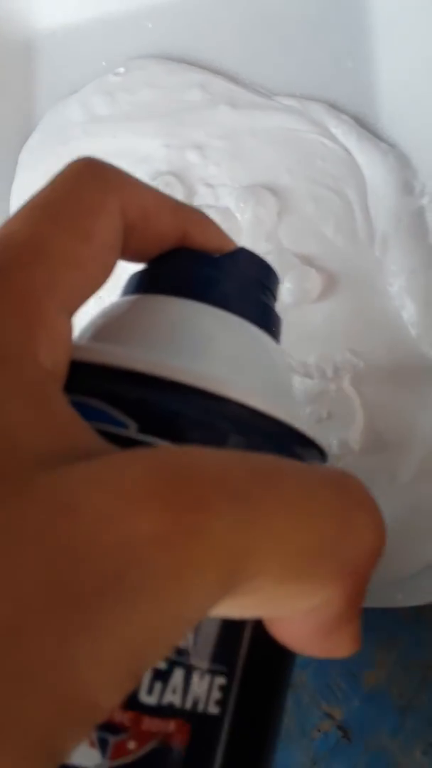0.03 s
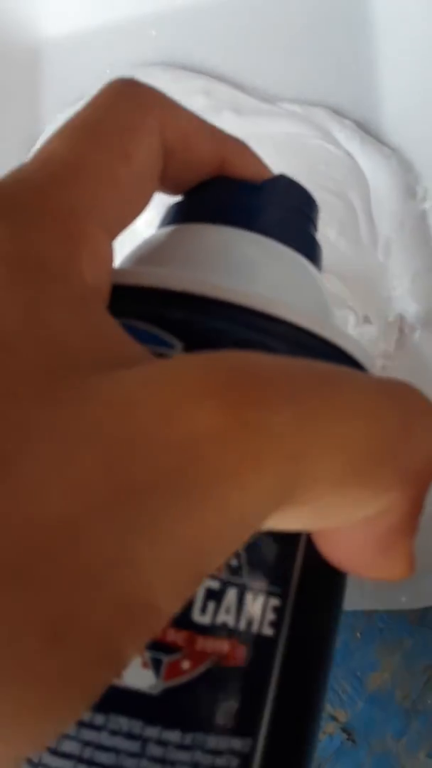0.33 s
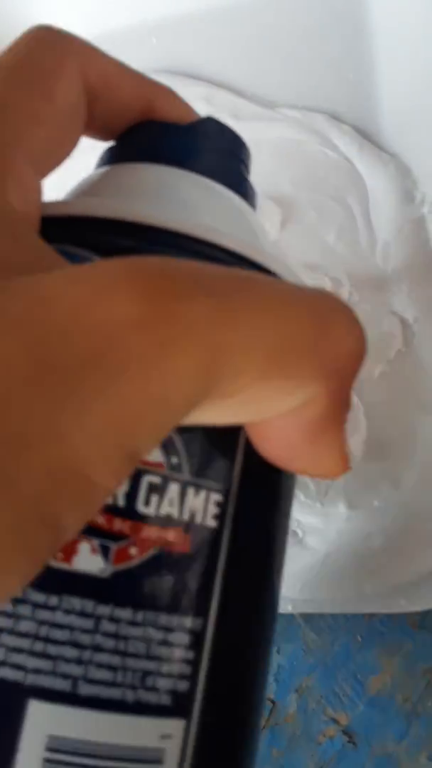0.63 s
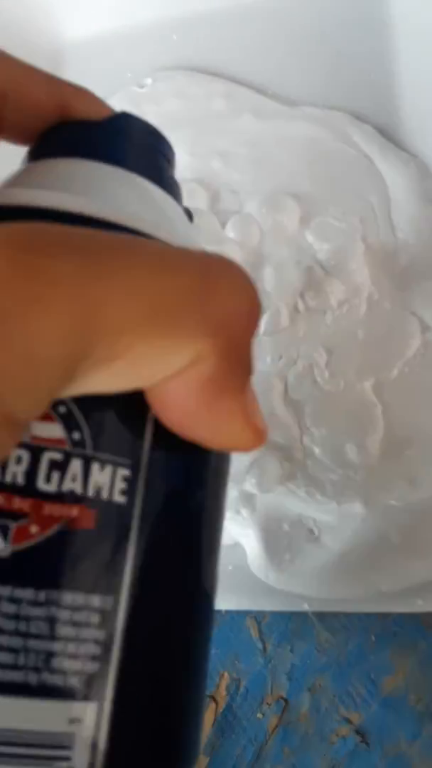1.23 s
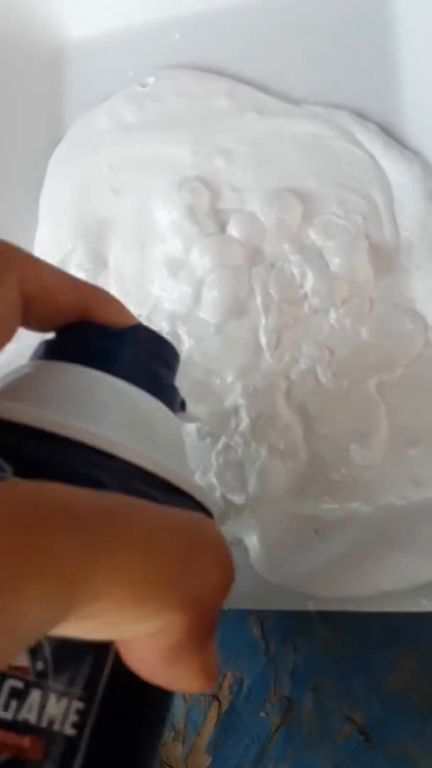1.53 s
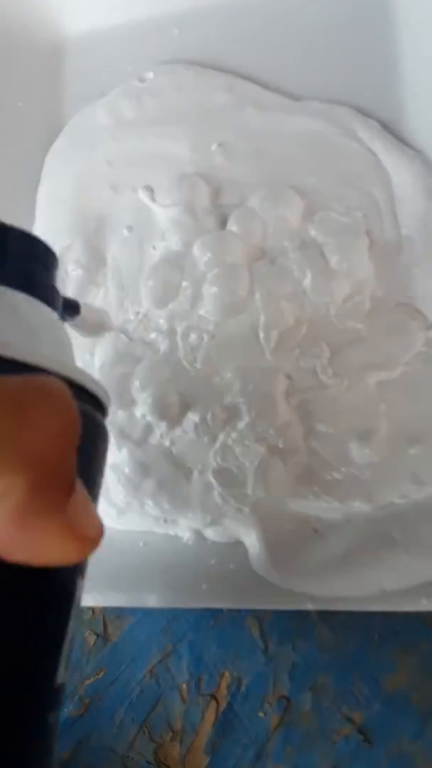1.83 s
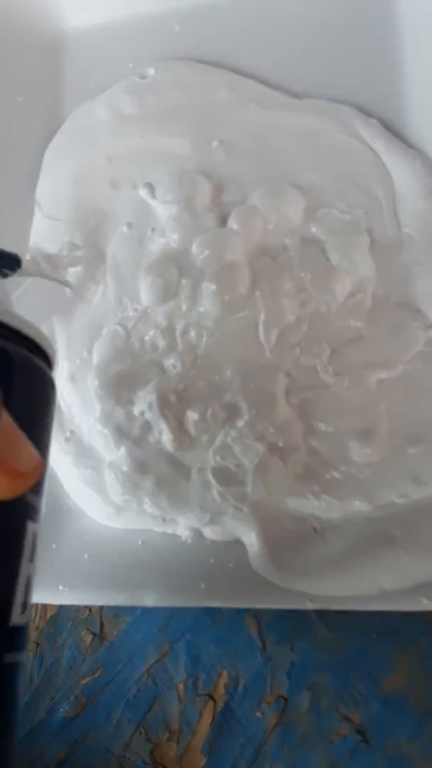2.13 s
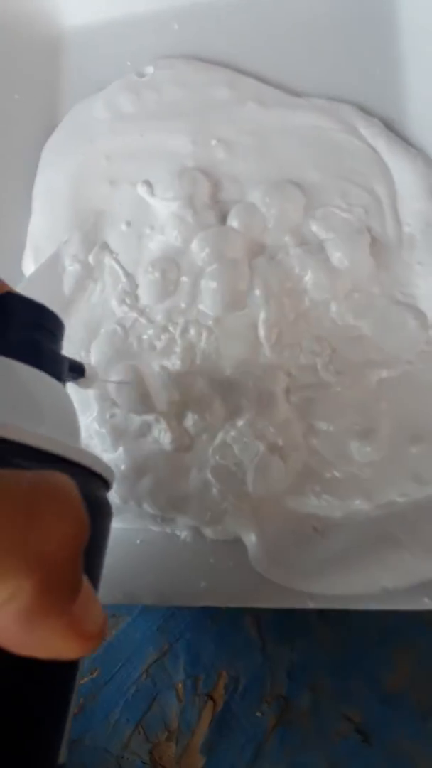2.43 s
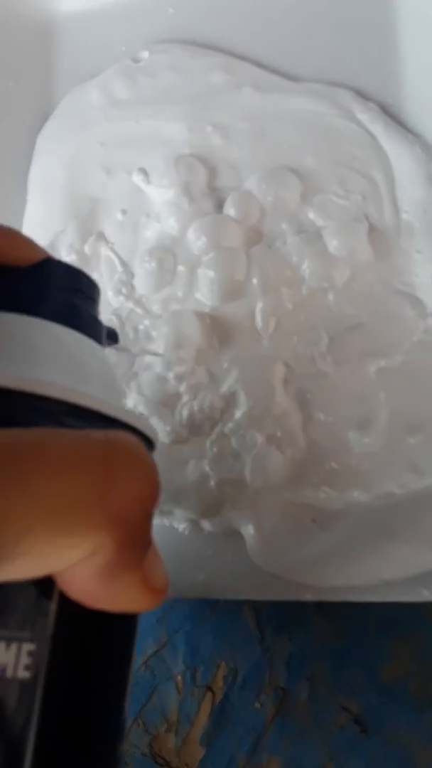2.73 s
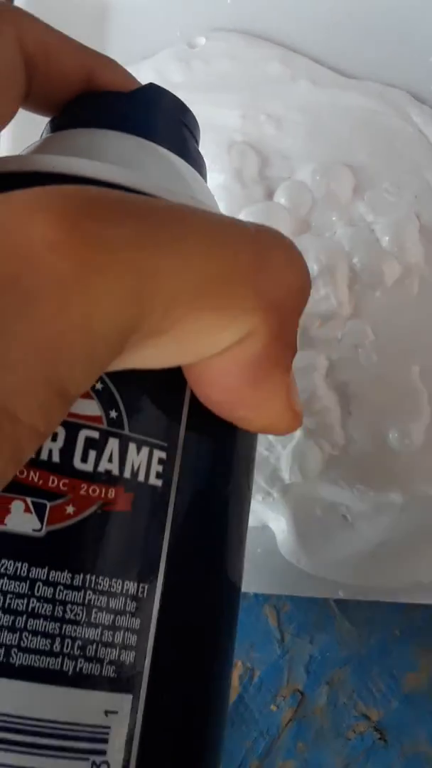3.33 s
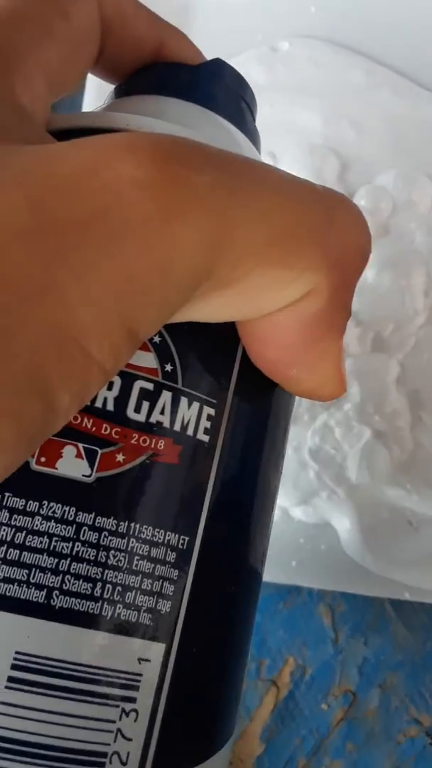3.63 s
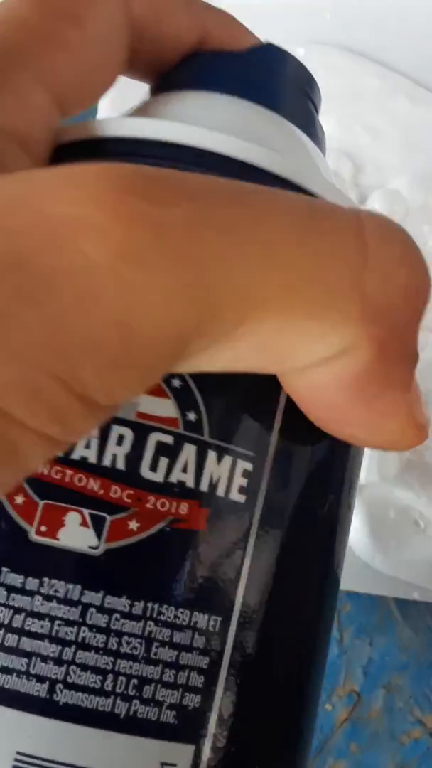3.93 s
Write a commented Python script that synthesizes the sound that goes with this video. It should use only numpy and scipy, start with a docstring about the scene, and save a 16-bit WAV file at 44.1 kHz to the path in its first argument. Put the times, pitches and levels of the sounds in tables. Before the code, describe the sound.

Shaving foam sprays from a pressurised can with a wet, sputtering hiss.

```python
"""Shaving foam sprayed into a tub

Foam sputters from a pressurised can into a plastic tub, close to a two-port microphone. The turbulent
jet hisses unevenly, gas pockets spit and plugs of foam squelch until the valve closes near the end.
Puffs of stirred air thump on the ports, over a low room hum."""
import sys
import numpy as np
from scipy import signal
from scipy.fft import rfft, irfft, next_fast_len
from scipy.io import wavfile
from scipy.ndimage import uniform_filter1d, map_coordinates

SR = 44100
rng = np.random.default_rng(int(sys.argv[2]) if len(sys.argv) > 2 else 0)


def store_pcm(level_fs):
    """Save levels as 16-bit WAV."""
    pcm = np.round(np.clip(level_fs, -1, 1) * 32767).astype(np.int16)
    wavfile.write(sys.argv[1], SR, np.atleast_2d(pcm).T)


N = 176400
CLOSE_S = 3.868  # the valve shuts

# Relative strength of the jet in three bands: time_s, body_db, treble_db, fizz_db
JET = [(0.0, -25, -35, -44.5), (1.02, -30.5, -30.5, -43.5), (1.08, -25.5, -28.5, -42.5),
       (1.19, -27, -31, -49.5), (2.22, -26.5, -32.5, -43.5), (2.81, -25, -36, -38.5),
       (3.57, -26, -36.5, -43), (3.66, -27, -34.5, -51), (3.75, -30, -28.5, -44), (3.85, -27.5, -35, -51)]


def hiss(gurgle_hz=1250, treble_hz=4300, fizz_hz=9200, close_db_per_s=755, fizzle_db=-32):
    """Turbulent jet noise in four bands, amplitude-modulated by clogging; upper bands partly go alone."""
    t = np.arange(N) / SR
    body_db, treble_db, fizz_db = curves(JET, t)
    shared_db = clogging()
    above = lambda hz, edge: 1 / np.sqrt(1 + (edge / (hz + 1)) ** 20)
    below = lambda hz, edge: 1 / np.sqrt(1 + (hz / edge) ** 20)
    body = outlet_cavity(jet_noise(lambda f: above(f, gurgle_hz) * below(f, treble_hz)))
    treble = outlet_cavity(jet_noise(lambda f: above(f, treble_hz) * below(f, fizz_hz)))
    fizz = outlet_cavity(jet_noise(lambda f: above(f, fizz_hz)))
    gurgle = jet_noise(lambda f: below(f, gurgle_hz))
    gurgle_db = -39.5 - 0.7 * (t - t.mean())  # fades as foam piles up
    jet = amp(gurgle_db) * gurgle * unit(amp(clogging()))
    jet += amp(body_db - 2.5) * body * unit(amp(shared_db))
    jet += amp(treble_db - 2.5) * treble * unit(amp(shared_db + 2.4 * clogging()))
    jet += amp(fizz_db - 5) * fizz * unit(amp(shared_db + 2 * clogging()))
    valve_db = np.maximum(-close_db_per_s * np.maximum(t - CLOSE_S, 0), fizzle_db)
    return jet * amp(valve_db)


def clogging(surge_db=1.15, flutter_db=2.5):
    """Foam throttles the flow at random: a gain in dB with slow surges and fast flutter."""
    return surge_db * wobble(34.71) + flutter_db * wobble(260)


def jet_noise(colour, size=N):
    """Partially coherent nozzle noise at the two ports; the left is nearer, so brighter."""
    # Spectrum of all that leaves the nozzle: frequency_hz, level_db
    nozzle = [(150, -12.5), (400, -15), (560, -13), (800, -3.5), (990, -12.5), (1200, -1.5), (1480, 3),
              (1700, 3.5), (2000, 1.5), (2500, 0.5), (3400, -3), (4500, -5), (5400, -3.5), (7000, -3.5),
              (8400, -4), (9300, -17.5), (11500, -16), (13000, -17.5), (15800, -18.5)]
    # Likeness of the sound at the two ports: frequency_hz, correlation
    coherence = [(400, 0.04), (700, 0.5), (1550, 0.88), (2500, 0.94), (5000, 0.18), (14000, -0.06)]
    # Level difference between the ports: frequency_hz, left_minus_right_db
    balance = [(400, 4.5), (800, -0.5), (1100, 5.5), (1500, 0.5), (2100, 4), (3500, 2), (4900, 6),
               (5600, 4.5), (8000, 8.5), (14000, 6)]
    hz = np.fft.rfftfreq(size, 1 / SR)
    mid, side = rfft(rng.standard_normal((2, size))) * amp(along(nozzle, hz)) * colour(hz)
    mix_angle = np.arccos(np.clip(along(coherence, hz), 0, 1)) / 2
    mid, side = mid * np.cos(mix_angle), side * np.sin(mix_angle)
    left_gain = amp(along(balance, hz) / 2)
    return unit(irfft(np.array([(mid + side) * left_gain, (mid - side) / left_gain]), size))


def outlet_cavity(x, width_oct=.115, patchy_db=3.5):
    """Cavity resonance: foam keeps reshaping the outlet, so two peaks glide among narrow random ones."""
    # Resonances of the outlet against the foam: time_s, lower_hz, lower_db, upper_hz, upper_db
    resonances = [(0, 2600, 13.5, 5680, 15.5), (.55, 2540, 8, 5470, 14.5), (.75, 2320, 7, 3970, 5),
                  (1.6, 2360, 9.5, 3500, 3), (1.78, 1980, 4.5, 3666, 6), (2.6, 2030, 6.5, 3401, -2),
                  (2.9, 2105, 10, 3351, 8), (3.35, 2184, 1, 3440, 3.5), (3.85, 2120, 9.5, 3170, 11.5)]
    hz, t, spectrum = signal.stft(x, SR, nperseg=1024)
    patches = uniform_filter1d(rng.standard_normal(spectrum.shape), size=5, axis=0)
    patches = unit(uniform_filter1d(patches, size=7, axis=1))
    lower_hz, lower_db, upper_hz, upper_db = curves(resonances, t)
    gain_db = patchy_db * patches + lower_db * bump(hz[:, None], lower_hz, width_oct)
    gain_db += upper_db * bump(hz[:, None], upper_hz, width_oct)
    return unit(signal.istft(spectrum * amp(gain_db), nperseg=1024)[1][:, :N])


def spits():
    """Sudden pressure release: large gas pockets burst through the nozzle as short noise pulses."""
    # The loudest gas pockets: peak_s, relative_db, centre_hz
    gas_pockets = [(0.12, -12.5, 5200), (0.165, -14.5, 4700), (0.18, -10.5, 6140), (0.209, -11, 3020),
                   (0.232, -10.5, 5170), (0.448, -12.5, 5080), (0.286, -16, 4264), (0.575, -15, 5430),
                   (0.636, -15, 4400), (0.805, -12, 5015), (0.863, -11, 4050), (0.905, -14.5, 6900),
                   (0.943, -24, 4110), (1.114, -14, 3940), (1.347, -17, 7510), (1.398, -12, 3726),
                   (1.457, -10, 4145), (1.502, -8, 5600), (1.571, -13.5, 2570), (1.647, -10, 4830),
                   (1.723, -16.5, 4030), (1.799, -13, 4700), (1.865, -15.5, 5600), (1.881, -13.5, 5565),
                   (1.973, -11.5, 6200), (2.002, -14.5, 4020), (2.063, -17, 3928), (2.291, -12.5, 5280),
                   (2.342, -11.5, 6370), (2.435, -13.5, 4760), (2.614, -9.5, 4660), (2.702, -16.5, 5500),
                   (3.259, -8, 7495), (3.472, -11.5, 4985), (3.484, -14, 5100), (3.561, -12, 4690),
                   (3.697, -14, 12790), (3.74, -11, 4870), (3.806, -14.5, 4087)]
    out = np.zeros((2, N))
    for peak_s, db, hz in gas_pockets:
        add_burst(out, peak_s, db - 5, pocket_noise(hz, focus_db=12), width_s=.0032)
    return out


def pocket_noise(centre_hz, focus_db):
    """Band emphasis: the noise of one gas pocket is strongest around its own pitch."""
    return jet_noise(lambda f: amp(focus_db * bump(f, centre_hz, octaves=.3)), size=2048)


def squelches(gap_s=.004, fade_db=44, rise_oct=.31):
    """Film rupture: a plug of foam breaks up in a quick run of pops, rising in pitch as it thins."""
    # Wet plugs squeezing through the nozzle: peak_s, relative_db, centre_hz, half_length_s
    plugs = [(0.026, -26, 5000, 0.028), (0.174, -23, 5550, 0.032), (.365, -33.5, 12400, 0.024),
             (0.334, -25, 5940, 0.049), (0.453, -30, 5730, 0.023), (0.514, -28, 4840, 0.056),
             (0.647, -23, 5330, 0.013), (0.812, -27, 4950, 0.067), (0.941, -24, 4290, 0.042),
             (1.063, -24.5, 2805, 0.031), (1.1, -43, 12990, 0.041), (1.202, -22.5, 2828, 0.0082),
             (1.32, -26, 3533, 0.041), (1.399, -23.5, 3890, 0.04), (1.449, -24, 3043, 0.035),
             (1.576, -28, 2550, 0.023), (1.63, -26.5, 3538, 0.049), (1.799, -26, 5074, .02),
             (1.872, -26.5, 3580, 0.042), (1.875, -25.5, 6700, 0.046), (1.956, -28, 6400, 0.049),
             (2.09, -26.5, 6100, 0.056), (2.146, -20, 5480, 0.018), (2.196, -27.5, 5613, 0.087),
             (2.289, -24, 3727, 0.027), (2.354, -28.5, 7190, 0.042), (2.452, -29.5, 4717, 0.05),
             (2.487, -19.5, 3248, 0.015), (2.56, -23.5, 7500, 0.037), (2.713, -25.5, 3280, 0.021),
             (2.799, -23.5, 13100, 0.0047), (1.976, -38.5, 11960, 0.043), (2.983, -22, 3266, 0.015),
             (3.079, -28, 7200, 0.063), (3.113, -25.5, 3520, 0.023), (3.196, -28, 3575, 0.058),
             (3.247, -25, 7390, 0.017), (3.349, -26, 3400, 0.029), (3.495, -30, 5480, 0.094),
             (3.739, -29.5, 4940, 0.016), (3.778, -23.5, 3150, 0.019)]
    out = np.zeros((2, N))
    for peak_s, db, hz, half_length_s in plugs:
        draws = np.clip(rng.standard_normal(size=(64, 3)), -2, 2)
        offsets_s = np.arange(-half_length_s, half_length_s, gap_s)
        for offset_s, (louder, higher, later) in zip(offsets_s, draws):
            progress = offset_s / half_length_s  # -1 to 1 through the plug
            level_db = db + 4 - fade_db * progress ** 2 + 2.6 * louder
            pitch_hz = hz * 2 ** (rise_oct * progress + .1 * higher)
            pop_s = peak_s + offset_s + gap_s * later / np.pi
            add_burst(out, pop_s, level_db, pocket_noise(pitch_hz, focus_db=24.5), width_s=.0026)
    return out


def bubbles(per_s, band, gain_db, spread_db, centre_hz, scatter_oct, focus_db, width_s):
    """Shot noise: small pockets burst at random, following one band of the jet (1 treble, 2 fizz)."""
    out = np.zeros((2, N))
    times = rng.uniform(0, CLOSE_S, size=800)[:int(per_s * CLOSE_S)]
    draws = np.clip(rng.standard_normal(size=(800, 3)), -2, 2)
    for peak_s, (louder, higher, longer) in zip(times, draws):
        level_db = curves(JET, peak_s)[band] + gain_db + np.clip(spread_db * louder, -10, 10)
        grain = pocket_noise(centre_hz * 2 ** (scatter_oct * higher), focus_db)
        add_burst(out, peak_s, level_db, grain, width_s * np.exp(0.53 * longer))
    return out


def whistle(peak_s=2.68, width_s=.33, level_db=-45, pitch_hz=13300, flutter_db=6):
    """Narrow-band noise is heard as pitch: a high, stuttering whistle swells and fades once."""
    swell = np.exp(-((np.arange(N) / SR - peak_s) / width_s) ** 2)
    band = jet_noise(lambda f: bump(f, pitch_hz, octaves=.11))
    return amp(level_db) * swell * unit(band * amp(flutter_db * wobble(300)))


def sway(x):
    """Path difference: the can's position sets the foam's echo and the ports' balance and phase."""
    # Movement of the can: time_s, left_minus_right_db, place (0 ahead, 1 aside)
    path = [(0, -0.6, 0.028), (1.3, -1, 0.072), (1.75, -1, 1), (2.7, 0, 0.98), (3.2, 0, .8),
            (3.7, -3.5, 0.65)]
    # Phase lead of the left port: frequency_hz, can_ahead_rad, can_aside_rad
    phase_lead = [(510, 0.28, 0.23), (1120, 1.24, 1.85), (1520, 3.1, 3.18), (1770, 4.27, 4.64),
                  (2124, 7.86, 8.05), (3170, 7.7, 5), (4320, 8.3, 8.8), (5450, 12.1, 13.2),
                  (7100, 17.1, 22.4), (15200, 23.8, 48.53)]
    balance_db, place = curves(path, np.arange(N) / SR)
    panned = foam_echo(x, place) * amp(np.array([balance_db, -balance_db]) / 2)
    hz, t, spectrum = signal.stft(panned, SR, nperseg=1024)
    ahead, aside = [along(np.array(phase_lead)[:, [0, k]], hz)[:, None] for k in (1, 2)]
    lead_rad = ahead + (aside - ahead) * curves(path, t)[1]
    half_turn = np.exp(.5j * lead_rad)
    return signal.istft(spectrum * np.array([half_turn, 1 / half_turn]), nperseg=1024)[1][:, :N]


def foam_echo(x, place, delay_s=.00095, swing_s=.00022, gain=.36, above_hz=3800):
    """Comb filtering: the foam's surface reflects the treble, later when the can is held aside."""
    delays_s = [delay_s + swing_s * (place + wobble(2) / 2) for port in x]
    treble = signal.sosfilt(signal.butter(2, above_hz, 'high', fs=SR, output='sos'), x)
    echo = [map_coordinates(port, [np.arange(N) - SR * lag]) for port, lag in zip(treble, delays_s)]
    return x + gain * np.array(echo)


def tub(x, t60_s=.1, tail_db=-10):
    """Reverberation: reflections between the tub's walls add a very short exponential tail."""
    t = np.arange(SR // 4) / SR
    tail = rng.standard_normal((2, len(t))) * amp(-60 * t / t60_s)
    tail /= np.linalg.norm(tail[0])
    return x + amp(tail_db) * signal.fftconvolve(x, tail, axes=1)[:, :N]


def stirred_air(puff_hz=164.6, brighten_oct_per_db=.015):
    """Wind noise: local pressure fluctuations rumble and thump on each port separately."""
    # Strength of the draught: time_s, level_db
    draught = [(0, -45.5), (.14, -35.5), (1.28, -32.5), (1.45, -37.5), (2.4, -34.5), (3.45, -28.5),
               (3.7, -38.5)]
    # Spectrum of its rumble: frequency_hz, level_db
    rumble = [(32, -62), (65, -8.5), (110, 2), (180, 2), (300, -9.5), (500, -22.5), (900, -46)]
    # Puffs that strike the ports: peak_s, relative_db
    puffs = [(0.159, -19), (0.213, -21), (0.241, -20), (0.594, -17), (0.761, -22), (0.846, -19),
             (1.043, -20), (1.073, -20), (1.095, -19), (1.13, -24.5), (1.201, -19.5), (1.259, -21),
             (1.647, -23.5), (1.841, -14), (2.063, -23.5), (2.094, -21), (2.198, -21), (2.355, -24),
             (2.403, -19), (2.44, -20), (2.686, -13.5), (2.849, -18), (2.886, -14), (2.965, -22),
             (3.029, -21), (3.093, -19.5), (3.188, -26.5), (3.243, -21.5), (3.271, -18), (3.315, -18),
             (3.361, -21.5), (3.398, -17), (3.436, -20), (3.461, -18.5), (3.5, -18.5), (3.563, -18)]
    level_db, = curves(draught, np.arange(N) / SR)
    gusts = amp(3.0 * np.array([wobble(40), wobble(40)]))
    out = amp(level_db) * unit(gusts * noise(lambda f: amp(along(rumble, f))))
    mean_db = np.mean(puffs, axis=0)[1]
    for peak_s, db in puffs:
        hz = puff_hz * 2 ** (brighten_oct_per_db * (db - mean_db))  # harder puffs are brighter
        grain = noise(lambda f: bump(f, hz, octaves=.69), size=8192)
        add_burst(out, peak_s, db - 2.5, grain, width_s=.018, skew=1.03)
    return out


def room(noise_db=-45.5, hum_hz=107, hum_db=-43.5):
    """Ambient noise floor, with a low hum that wavers by phase modulation."""
    # Spectrum of the background: frequency_hz, level_db
    ambience = [(25, -57), (60, -5), (120, -2), (250, -37), (600, -32), (930, -21), (1200, -35),
                (15000, -69)]
    phase = 2 * np.pi * hum_hz * np.arange(N) / SR + 0.6 * wobble(7)
    return amp(noise_db) * noise(lambda f: amp(along(ambience, f))) + amp(hum_db) * unit(np.sin(phase))


def add_burst(out, peak_s, level_db, grain, width_s, skew=1.5):
    """Mix in a noise grain under a sech envelope; skew above 1 makes the fall slower than the rise."""
    size = grain.shape[1]
    t = (np.arange(size) - size // 2) / SR
    steepness = np.sqrt(2) * np.where(t < 0, 1 + skew ** 2, 1 + skew ** -2)
    envelope = 1 / np.cosh(np.minimum(np.abs(t) / width_s * steepness, 20))
    burst = grain * envelope
    burst *= amp(level_db) * np.sqrt(2 * np.sum(envelope ** 2) / np.sum(burst ** 2))
    at = round(peak_s * SR) - size // 2 + np.arange(size)
    inside = (at >= 0) & (at < N)
    out[:, at[inside]] += burst[:, inside]


def noise(colour, size=N):
    """Two incoherent noises of rms 1, with amplitude spectrum colour(hz)."""
    white = rfft(rng.standard_normal((2, size)))
    return unit(irfft(white * colour(np.fft.rfftfreq(size, 1 / SR)), size))


def wobble(knots_per_s):
    """A smooth random curve with no extreme swings."""
    knots = np.clip(rng.standard_normal(int(N * knots_per_s / SR) + 4), -2, 2)
    return map_coordinates(knots, [np.arange(N) * knots_per_s / SR])


def bump(hz, centre_hz, octaves):
    """A Gaussian bell on a log-frequency axis."""
    return np.exp(-.5 * (np.log2((hz + 1) / centre_hz) / octaves) ** 2)


def along(points, hz):
    """Interpolate (frequency_hz, value) points on a log-frequency axis."""
    knots_hz, values = np.transpose(points)
    return np.interp(np.log(hz + 1), np.log(knots_hz + 1), values)


def curves(rows, t):
    """Interpolate each column after time_s at the times t."""
    times, *columns = np.transpose(rows)
    return [np.interp(t, times, column) for column in columns]


def amp(db):
    """Decibels to amplitude ratio."""
    return 10 ** (np.asarray(db) / 20)


def unit(x):
    """Scale to rms 1."""
    return x / np.sqrt(np.mean(x ** 2) + 1e-20)


def scene():
    """Superposition: the swaying can sprays into the tub, over stirred air and the room."""
    sputter = bubbles(per_s=160, band=1, gain_db=3, spread_db=4,
                      centre_hz=4740, scatter_oct=.51, focus_db=19, width_s=.0017)
    crackle = bubbles(per_s=110, band=2, gain_db=8.5, spread_db=10.5,
                      centre_hz=11200, scatter_oct=.28, focus_db=15.5, width_s=.00094)
    spray = hiss() + spits() + squelches() + whistle() + sputter + crackle
    return tub(sway(spray)) + stirred_air() + room()


def record(dry):
    """Band limiting: the microphone chain passes nothing above its top frequency."""
    top_hz = 16100
    size = next_fast_len(N + SR // 2)
    passband = np.fft.rfftfreq(size, 1 / SR) < top_hz
    return irfft(rfft(dry, size) * passband, size)[:, :N]


dry = scene()
out = record(dry)
store_pcm(out)
```